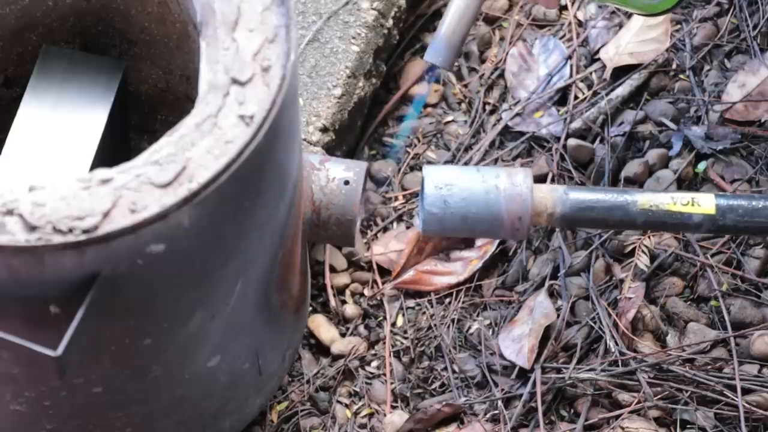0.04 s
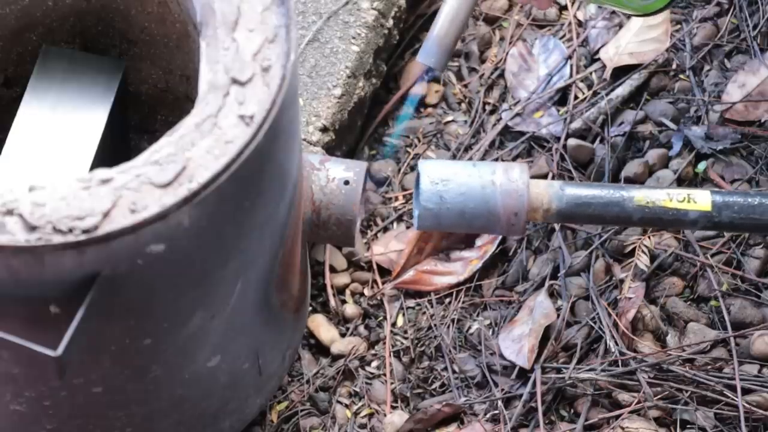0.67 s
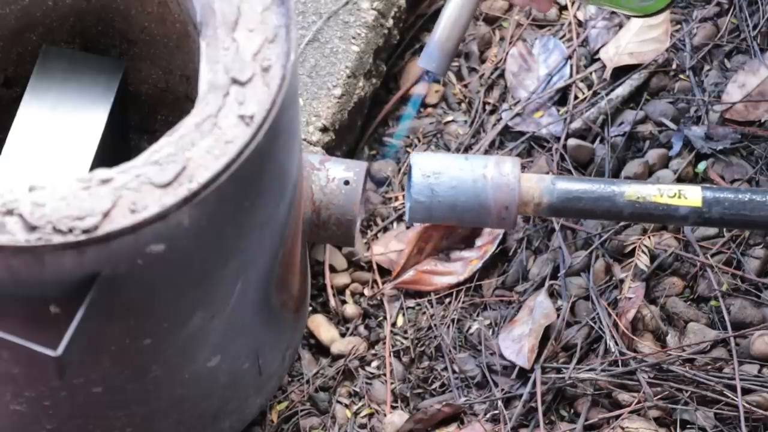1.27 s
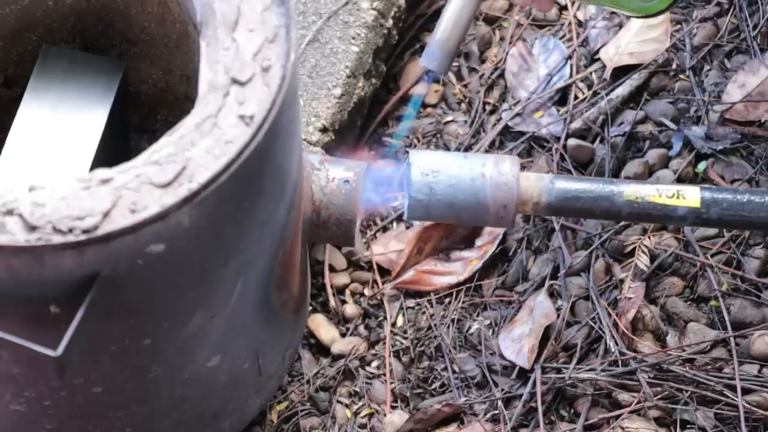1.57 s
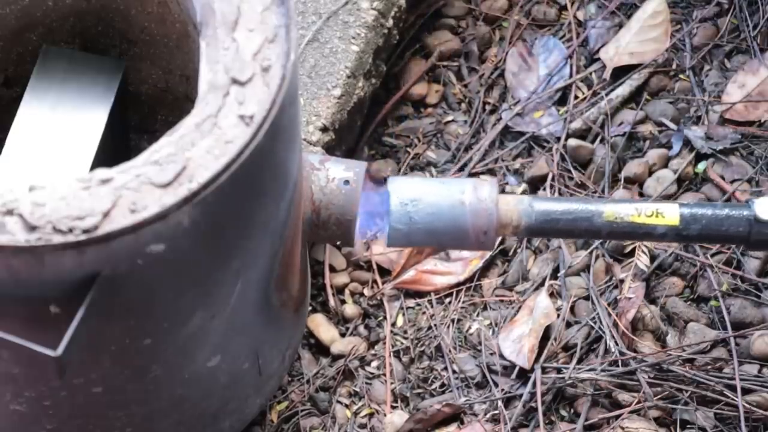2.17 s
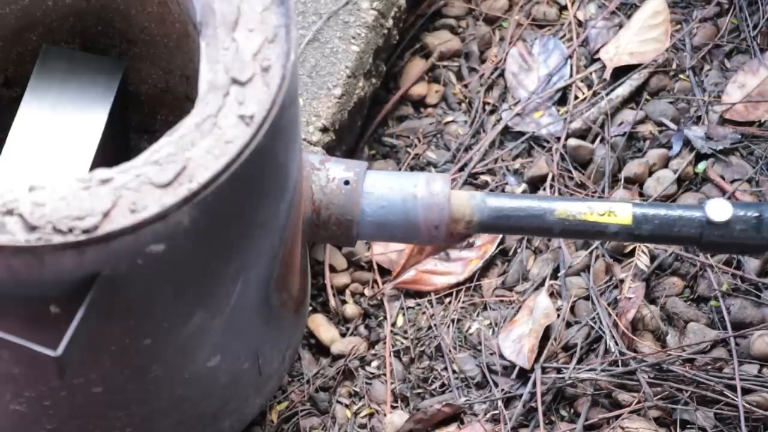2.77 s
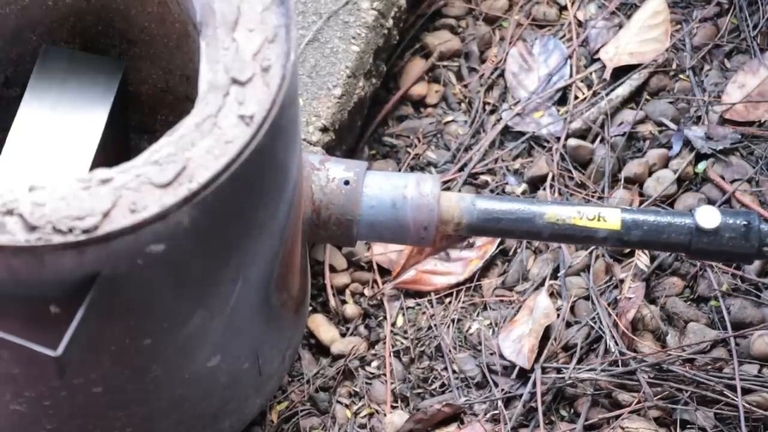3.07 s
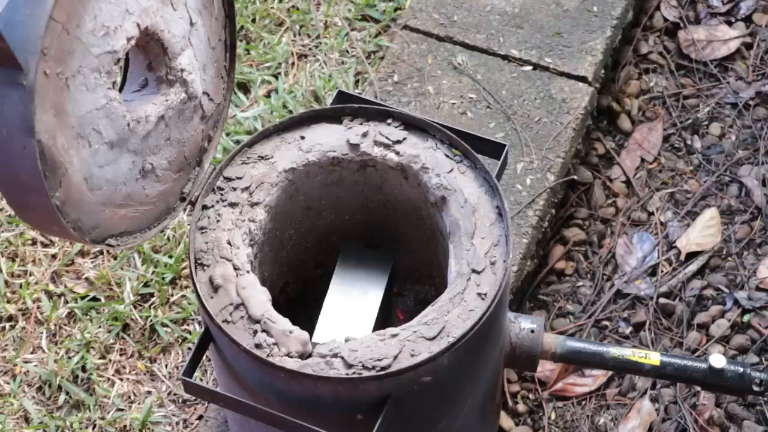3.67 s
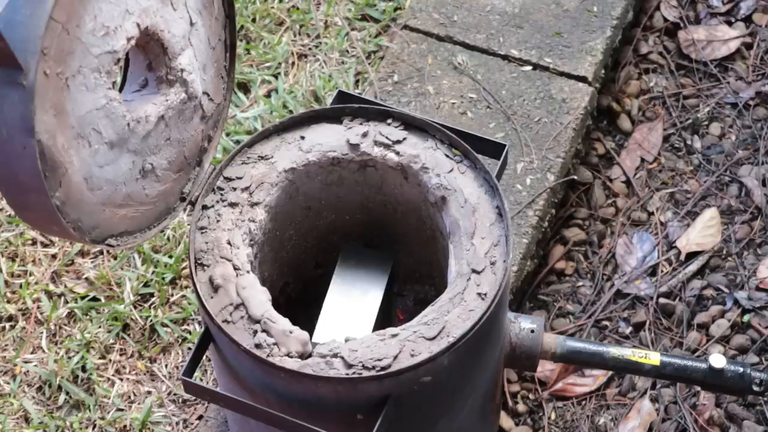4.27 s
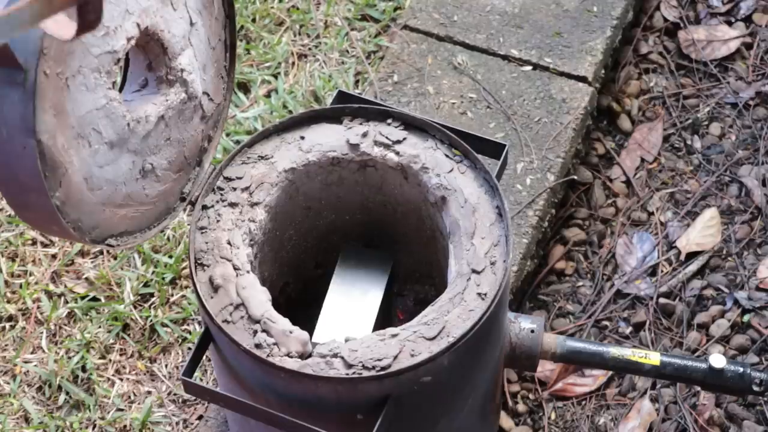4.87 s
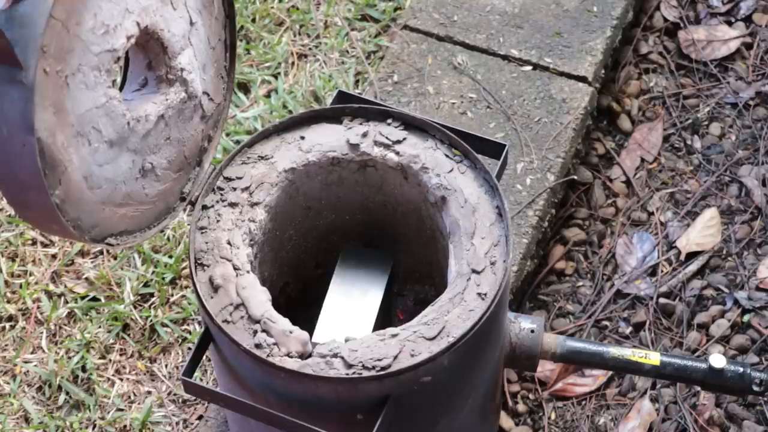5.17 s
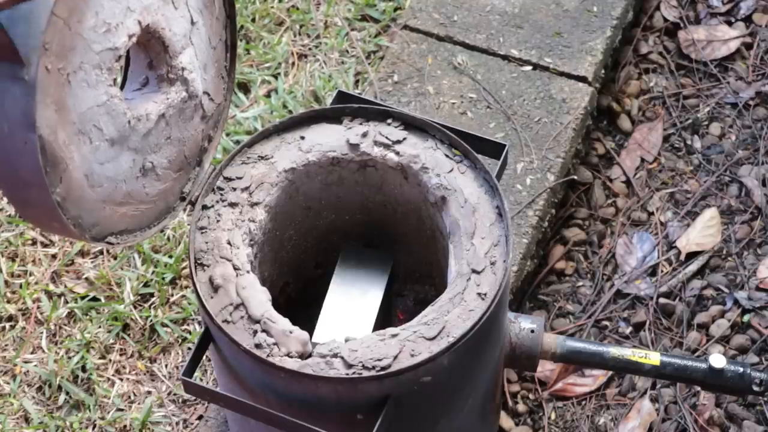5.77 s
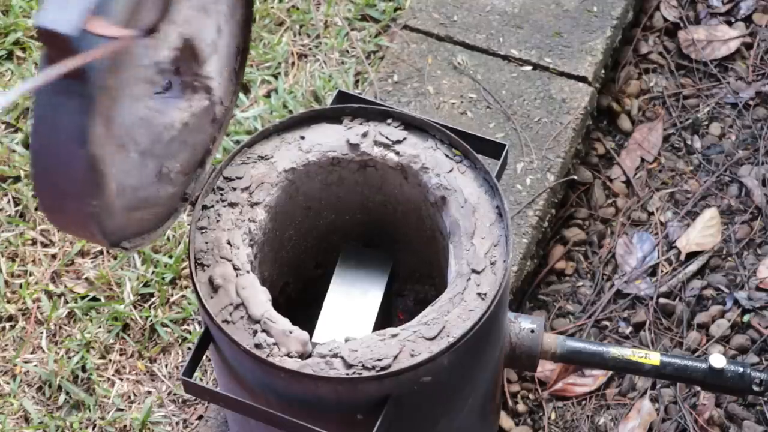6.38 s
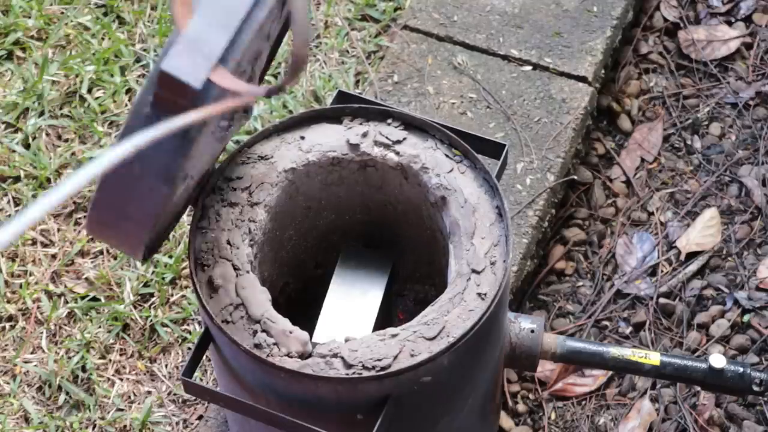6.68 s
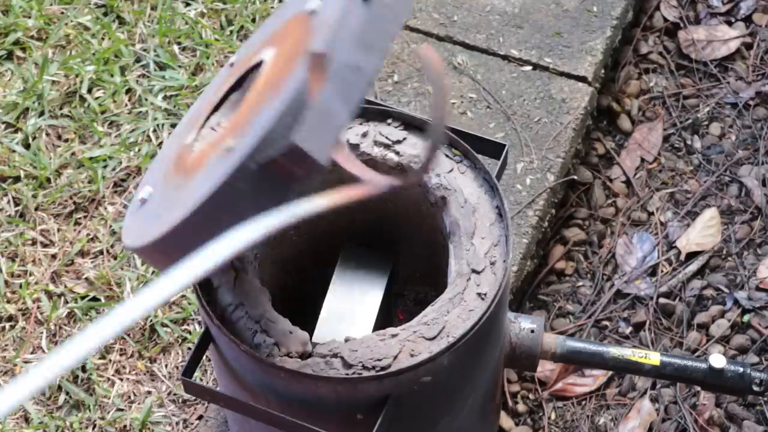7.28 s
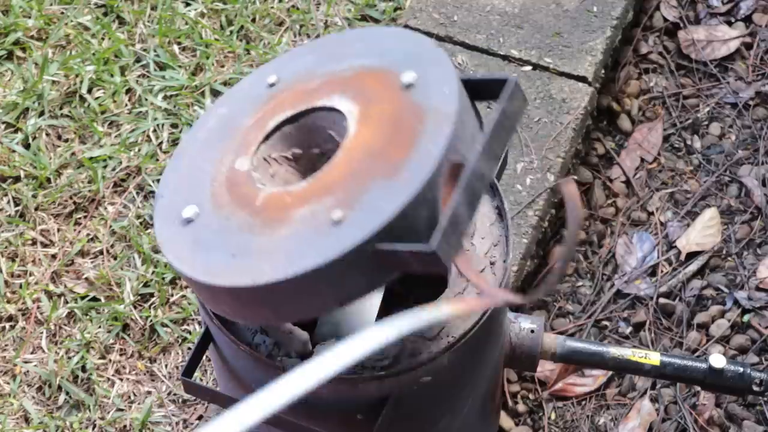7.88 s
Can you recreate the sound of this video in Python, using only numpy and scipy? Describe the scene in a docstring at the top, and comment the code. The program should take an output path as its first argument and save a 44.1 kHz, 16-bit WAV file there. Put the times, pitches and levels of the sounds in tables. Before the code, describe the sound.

A gas burner catches with a thump and settles into a hollow roar inside a furnace, while steel parts clink and scrape outdoors.

```python
"""Lighting a small gas furnace

A hand torch hisses and flutters outdoors. A gas burner catches with a whoomph and is pushed into the
side port of a clay-lined furnace: its bright open flame gives way to a hollow roar as it drives the
chamber's air modes. The steel pipe clinks in the port, a hook clicks and scrapes as it is picked up,
and the lid swings over the mouth, sweeping the colour of the roar."""
import sys
import numpy as np
from scipy import signal
from scipy.fft import rfft, irfft
from scipy.io import wavfile
from scipy.ndimage import uniform_filter1d, map_coordinates

SR = 44100
rng = np.random.default_rng(int(sys.argv[2]) if len(sys.argv) > 2 else 0)


def generate_wav(sig):
    """Save sig (samples, or channels by samples) to the path in sys.argv[1] as 16-bit PCM at SR."""
    pcm = np.round(np.clip(np.atleast_2d(sig).T, -1, 1) * 32767).astype(np.int16)
    wavfile.write(sys.argv[1], SR, pcm)


N = 354563
TIME = np.arange(N) / SR
FREQ = np.maximum(np.arange(N // 2 + 1) * SR / N, 1)
BLAST_S, BLAST_RISE_S = 1.452, 0.045  # the burner's flame takes hold

# chamber air modes with the nozzle outside the port (frequency [Hz], width [Hz], gain [dB])
OPEN_CHAMBER_MODES = [(313.5, 34, 13.2), (390, 17, 8.9), (453.4, 33, 13.6), (621, 81, 10.8),
                      (717.6, 31, 12), (818, 20, 6.2), (906, 30, 9.3)]


def undb(db):
    """Decibels to gain."""
    return 10 ** (np.asarray(db) / 20)


def ramp(start_s, rise_s):
    """A straight rise from 0 to 1."""
    return np.clip((TIME - start_s) / rise_s, 0, 1)


def swell(peak_s, half_s):
    """A smooth rise to 1 and fall back to 0."""
    return np.exp(-((TIME - peak_s) / half_s) ** 2)


def wobble(rate_hz):
    """Random levels, each held for 1 / rate_hz seconds and smoothed twice; spread near 1."""
    hold = max(int(SR / rate_hz), 2)
    steps = np.repeat(rng.standard_normal(N // hold + 1), hold)
    return 1.3 * uniform_filter1d(uniform_filter1d(steps, hold), hold)[:N]


def automation(table):
    """Each value column of a table, joined by straight lines in time."""
    times, *columns = np.transpose(table)
    return [np.interp(TIME, times, column) for column in columns]


def eq_curve(points):
    """(frequency [Hz], value) points joined by straight lines on a log-frequency axis."""
    hz, value = np.transpose(points)
    return np.interp(np.log(FREQ), np.log(hz), value)


def resonances(modes):
    """Gain by frequency of a set of peaks and hollows."""
    return undb(sum(db / (1 + (2 * (FREQ - hz) / width) ** 2) for hz, width, db in modes))


def add(out, start_s, sound):
    """Mix a short sound in at its time."""
    start = max(int(start_s * SR), 0)
    out[:, start:start + sound.shape[1]] += sound[:, :max(N - start, 0)]


def reflections(sound, strength=0.9, from_hz=4200, left_lag_s=5e-5):
    """Hard surfaces nearby comb the treble; the sound arrives a little earlier on the right."""
    # bounces off furnace wall, paving and ground (left delay [s], right delay [s], gain [ratio])
    echoes = [(.00085, 0.00093, .2), (.00141, 0.0013, 0.31), (.00262, 0.002, .2), (.0061, 0.007, 0.31),
              (0.011, .0109, .16)]
    share = strength / (1 + (from_hz / FREQ) ** 4)
    phase = -2j * np.pi * FREQ
    bounces = sum(gain * np.exp(phase * [[left], [right]]) for left, right, gain in echoes)
    comb = (1 + share * bounces) / np.sqrt(1 + share ** 2 * sum(gain ** 2 for _, _, gain in echoes))
    return irfft(rfft(sound) * comb * np.exp(phase * [[left_lag_s], [0]]), N)


def turbulence(spectrum, modes, pan_db=0):
    """Resonant flow noise at rms 1: the bass is near mono, the treble wide and leaning right."""
    # stereo likeness (frequency [Hz], correlation [0-1])
    likeness = [(60, .992), (290, .975), (640, .88), (1100, .82), (1600, .55), (3100, .4), (6000, .15),
                (15000, .1)]
    # stereo balance (frequency [Hz], left minus right [dB])
    balance = [(60, 1), (380, 0), (700, -1.2), (1250, -1), (2200, -8), (3200, -6.5), (4600, -4.5),
               (8000, -8.5), (15000, -10)]
    mid, side = rng.standard_normal((2, len(FREQ))) + 1j * rng.standard_normal((2, len(FREQ)))
    alike, sign = eq_curve(likeness), np.array([[1], [-1]])
    noise = np.sqrt(1 + alike) * mid + sign * np.sqrt(1 - alike) * side
    colour = undb(eq_curve(spectrum)) * resonances(modes)
    pan = undb(sign * (eq_curve(balance) + pan_db) / 2)
    flow = reflections(irfft(noise * colour * pan, N))
    return flow / flow.std()


def grit(envelope, hz, octaves, pan_db):
    """Stereo contact noise, shaped by an envelope and filtered to a band around hz."""
    n = len(envelope)
    freq = np.maximum(np.arange(n // 2 + 1) * SR / n, 1)
    band = np.exp(-0.5 * (np.log2(freq / hz) / octaves) ** 2)
    band /= np.sqrt(np.mean(band ** 2))
    noise = rng.standard_normal((2, n)) + 0.5 * rng.standard_normal(n)
    return irfft(rfft(noise * envelope) * band, n) * undb([[pan_db / 2], [-pan_db / 2]])


def torch(aside_s=1.76, off_s=3.7, fade_s=0.1, attack_s=0.016, release_s=0.016):
    """A whistling gas jet and a small flame that rasps on steel; drawn aside, only the jet hisses on."""
    # spectra of the flame, its rasp and the gas jet (frequency [Hz], level [dB])
    flame_eq = [(20, -20), (50, -6), (90, -3), (170, 0), (250, -9.5), (400, -5.5), (600, -3.5),
                (900, -13.5), (1500, -26), (4000, -42)]
    rasp_eq = [(150, -24), (400, 5.5), (900, 5), (1400, -5), (1900, -8.5), (2400, -6.5), (3300, -6.5),
               (4800, -13.5), (8000, -11.5), (11000, -21), (16000, -34)]
    jet_eq = [(1000, -6), (2500, -4.5), (4000, -3), (5300, -5.5), (7200, -1), (9000, -0.5), (12000, -3),
              (13000, -7), (16000, -15)]
    # resonances of the flame beside the port, and of the jet (frequency [Hz], width [Hz], gain [dB])
    flame_modes = [(318, 57, 12.5), (466, 23, 12), (1380, 120, 9), (1620, 90, 11), (2250, 170, 12),
                   (2930, 300, 4.5)]
    jet_modes = [(3820, 360, 9.9), (7900, 380, 7.1), (8240, 770, 9.4), (10600, 200, 5), (11850, 300, 9.3)]
    # the flame licks the burner's steel nozzle (start [s], length [s], rasp level [dB])
    touches = [(-0.02, 0.068, -36), (0.073, 0.26, -39.5), (0.187, 0.082, -38), (0.56, 0.016, -44),
               (0.68, 0.22, -44)]
    touch = sum(undb(db) * ramp(start, attack_s) * np.exp(-np.maximum(TIME - start - length, 0) / release_s)
                for start, length, db in touches)
    flame = turbulence(flame_eq, flame_modes) * (undb(-43.5) + undb(-14) * touch)
    flame *= undb(1.5 * wobble(30))
    rasp = turbulence(rasp_eq, flame_modes, pan_db=1) * (undb(-62.5) + touch)
    rasp *= undb(1.2 * wobble(59.4))
    aside = ramp(aside_s - fade_s, fade_s)
    jet = turbulence(jet_eq, jet_modes, pan_db=3) * undb(-48 - 2 * aside)
    return (flame + rasp) * (1 - aside) + jet * (1 - ramp(off_s - fade_s, fade_s))


def burn_envelope(seated, catch_db, open_db, seated_db, power):
    """Gain of one burner layer: a soft catch, the blast, then a level set by the nozzle's depth."""
    catch = undb(catch_db) * ramp(start_s=1.385, rise_s=0.012)
    full = undb(open_db + (seated_db - open_db) * seated ** power)
    blast = ramp(BLAST_S, BLAST_RISE_S) ** 2
    return catch * (1 - blast) + full * blast


def burner():
    """Unsteady combustion drives the chamber's air; seating the nozzle turns open flame to hollow roar."""
    # how far the nozzle sits in the port (time [s], depth [0-1])
    seating = [(1.4, 0.02), (2.25, 0.02), (2.64, 0.2), (2.70, 0.44), (2.8, 0.62), (3.5, 0.73), (4.3, 0.99),
               (8.04, 0.97)]
    # the open flame dips and surges on its way to the port
    # (peak [s], half length [s], rumble change [dB], rasp change [dB])
    surges = [(1.557, 0.087, -3, -0.1), (1.702, 0.1, 5, 0.5), (2.52, 0.15, 2, 1.5)]
    # spectra of the flame's layers and the gas jet (frequency [Hz], level [dB])
    rumble_eq = [(15, -38), (28, -23), (45, -10), (70, -0.5), (110, -6), (180, -4.5), (230, -11),
                 (500, -47)]
    open_roar_eq = [(120, -23), (240, -4.5), (400, 2.5), (550, -8.5), (750, -7), (1000, -8), (1400, -19.5),
                    (2500, -40)]
    seated_roar_eq = [(120, -14.5), (210, -1), (250, 3.5), (330, 0.5), (480, -7), (560, -11.5),
                      (760, -13.5), (1000, -14), (1330, -17.5), (1550, -33), (3000, -57)]
    open_rasp_eq = [(300, -27), (700, -16), (1200, 0), (1600, -1), (2000, -0.5), (2450, -5), (2750, -9.5),
                    (3500, -12), (4600, -13), (7000, -16), (14000, -37)]
    seated_rasp_eq = [(300, -19), (1000, 6), (1400, -3.5), (1650, 2), (2000, 1.5), (2450, -0.5),
                      (2750, -8.5), (3400, -11.5), (4600, -10), (7000, -14.5), (14000, -44)]
    jet_eq = [(1500, -1.5), (3500, -1), (5000, -7.5), (7000, 0), (9000, 4), (11500, 4.5), (13000, 1),
              (14500, -8), (16000, -17)]
    # peaks and hollows of the chamber and the burner tube (frequency [Hz], width [Hz], gain [dB])
    bass_modes = [(100, 20, 8), (116.7, 14, -2.5), (148.4, 9.7, -4.5), (165.7, 28, 5.5), (205.5, 11, -14)]
    seated_chamber_modes = [(208, 10.5, -9), (239, 13, 2), (282.4, 44, 7), (342, 59, 2), (359, 9.5, -6),
                            (382.5, 50, 10.5), (432, 9.7, -9), (449, 40, 10), (620, 64, 9), (685, 63, 11),
                            (764, 24, -8), (814, 43, 4.5), (888, 32, -10.5), (920, 46, 5.5), (990, 45, 3.5),
                            (1095, 42, -9.5), (1140, 35, 6.5), (1253, 19, -2.5), (1279, 26, 7.5),
                            (1424, 32, 11), (1600, 33, -15)]
    open_tube_modes = [(1403, 22, 12.5), (1550, 25, 5), (1684, 36, 7), (1865, 42, 7), (2085, 47, 5.5),
                       (2290, 120, 2.5), (2550, 42, 9), (2840, 180, -3.5), (3057, 88, 11.5),
                       (3680, 69, 3.5), (4660, 190, -5.5), (6360, 210, 7.5), (8740, 340, 11),
                       (11100, 230, 1)]
    seated_tube_modes = [(1555, 47, 2.5), (1860, 83, 3), (2166, 52, 10), (2230, 45, -8), (2370, 29.4, 6),
                         (2465, 46, 7), (2620, 290, -7), (2916, 58, 10.5), (3070, 96, 6.5), (3480, 170, -3),
                         (3700, 110, 9), (4090, 170, 2.5), (4700, 300, -4), (10900, 600, 3)]

    seated, = automation(seating)
    inside, outside = np.sqrt(seated), np.sqrt(1 - seated)
    flutter = wobble(45)  # the flame front flaps, moving roar, rasp and jet together
    overshoot_db = 1.5 * swell(peak_s=1.555, half_s=0.036)
    rumble_surge_db = sum(db * swell(peak, half) for peak, half, db, _ in surges)
    rasp_surge_db = sum(db * swell(peak, half) for peak, half, _, db in surges)

    rumble = turbulence(rumble_eq, bass_modes) * undb(rumble_surge_db)
    rumble *= burn_envelope(seated, catch_db=-36, open_db=-25.5, seated_db=-28, power=3.2)

    roar = outside * turbulence(open_roar_eq, OPEN_CHAMBER_MODES)
    roar += inside * turbulence(seated_roar_eq, seated_chamber_modes)
    roar *= burn_envelope(seated, catch_db=-44, open_db=-28.5, seated_db=-18, power=0.13)
    roar *= undb(overshoot_db + 0.71 * flutter)

    rasp = outside * turbulence(open_rasp_eq, open_tube_modes, pan_db=-1)
    rasp += inside * turbulence(seated_rasp_eq, seated_tube_modes)
    rasp += port_gap(seated)
    rasp *= burn_envelope(seated, catch_db=-56, open_db=-30.5, seated_db=-42, power=2)

    jet = turbulence(jet_eq, seated_tube_modes, pan_db=1.5) * undb(1.2 * flutter)
    jet *= burn_envelope(seated, catch_db=-60, open_db=-41, seated_db=-44.5, power=6)

    rasp_motion_db = rasp_surge_db + overshoot_db + 0.8 * flutter + 0.98 * wobble(250)
    return rumble + roar + rasp * undb(rasp_motion_db) + jet


def whoomph(peak_s=1.573, rise_s=0.021, fall_s=0.028):
    """Gas gathered in the chamber goes up in one thump; the blast sets the burner tube singing."""
    # tube modes rung by the blast (frequency [Hz], width [Hz], gain [dB])
    tube_modes = [(2100, 79, 16), (2530, 70, 11), (3080, 90, 16)]
    # spectra of the thump and the tube's ring (frequency [Hz], level [dB])
    thump_eq = [(40, -14), (90, 10), (180, -9), (320, 5), (480, -7), (800, -35), (2500, -44)]
    ring_eq = [(1300, -25), (2100, 0), (3100, -6), (4000, -30)]
    age = TIME - peak_s
    thump = turbulence(thump_eq, OPEN_CHAMBER_MODES) * np.exp(np.minimum(age / rise_s, -age / fall_s))
    ring = turbulence(ring_eq, tube_modes) * swell(1.57, 0.083) * ramp(BLAST_S, BLAST_RISE_S)
    return undb(-13) * thump + undb(-32.5) * ring


def port_gap(seated, loudest_depth=0.7, depth_spread=0.24, glide=0.24):
    """The gap round the nozzle resonates while it is part way in, rising in pitch as it narrows."""
    # air mode of the ring-shaped gap (frequency [Hz], width [Hz], gain [dB])
    gap_modes = [(2360, 260, 17)]
    ring = turbulence([(1200, -28), (2300, 2), (4500, -31)], gap_modes)
    offset = seated - loudest_depth
    playhead = np.cumsum(1 + glide * offset) % N
    gliding = np.array([map_coordinates(channel, [playhead], mode="mirror") for channel in ring])
    return gliding * np.exp(-(offset / depth_spread) ** 2) * undb(-8)


def scrapes(rough_db=3.0, grain_db=1.0):
    """Something hard drags over grit in uneven slips and snapping grains; some drags ring the hook."""
    # (peak [s], rise [s], fall [s], level [dB], centre [Hz], width [octaves], hook share [0-1])
    drags = [(2.774, 0.0088, 0.012, -33, 4770, 1.1, 0.1), (4.999, 0.004, 0.014, -32, 8040, 0.88, .3),
             (5.135, 0.0014, 0.021, -29.5, 3800, 0.83, 0), (5.205, 0.03, 0.049, -33, 6300, 1.4, 0.6),
             (5.287, 0.003, 0.02, -28, 4400, 1.1, 0.25), (5.367, 0.0033, 0.016, -25.5, 3800, 0.98, 0.2),
             (5.485, .004, 0.0074, -31, 2300, 0.11, 0), (5.487, 0.0061, 0.006, -35, 3130, 0.12, 0),
             (5.481, 0.0022, 0.019, -34.5, 3280, 0.9, 0.1), (5.704, .004, 0.0063, -33, 2520, 0.9, 0),
             (5.740, 0.0044, 0.022, -36.5, 8500, 1.2, 1), (5.838, 0.045, 0.036, -31, 9200, 1.3, 1),
             (5.859, 0.014, 0.016, -26, 4000, 0.85, 0.55)]
    # thin rings of the steel hook (frequency [Hz], width [Hz], gain [dB])
    hook_modes = [(2700, 100, 11), (4060, 110, 13), (5870, 59, 14), (6400, 70, 9), (7300, 97, 15),
                  (8100, 460, -11), (8700, 80, 17), (8850, 90, 10), (9660, 60, 15), (10700, 58, 11),
                  (11030, 80, 7), (11300, 140, 11), (14500, 900, -10), (15400, 200, 11)]
    plain, ringing = np.zeros((2, 2, N))
    age = TIME[:SR // 2] - 0.25
    for peak_s, rise_s, fall_s, db, hz, octaves, share in drags:
        grains = undb(grain_db * np.minimum(rng.exponential(size=len(age)), 6))
        slips = undb(rough_db * wobble(700)[:len(age)]) * grains / np.sqrt(np.mean(grains ** 2))
        envelope = np.exp(np.minimum(age / rise_s, -age / fall_s)) * slips
        scrape = undb(db) * grit(envelope, hz, octaves, pan_db=-2.5)
        add(plain, peak_s + age[0], (1 - share) * scrape)
        add(ringing, peak_s + age[0], share * scrape)
    return plain + irfft(rfft(ringing) * resonances(hook_modes), N)


def clicks(ring_hz=14400, ring_t60=0.11, tail_db=-27, tail_t60=0.19):
    """Each contact cracks, scatters briefly off the ground and rings a cluster of high pipe modes."""
    # hits of steel and grit (time [s], level [dB], centre [Hz], width [octaves], t60 [s], ring [dB])
    hits = [(2.778, -35, 9500, .05, .04, -34), (2.8313, -23.5, 3500, 1.2, 0.032, -13),
            (2.8345, -22.5, 8000, 2, 0.056, -10.5), (3.3185, -34.5, 7000, 1.2, 0.16, -12),
            (3.635, -35, 7000, 1.2, 0.038, -5), (4.137, -8.5, 10900, .42, 0.01, -45),
            (4.1370, -14.5, 3540, 0.22, 0.009, -45), (4.1370, -18, 5700, 0.22, 0.0067, -45),
            (4.14, -28, 9500, .8, 0.037, -35), (4.1870, -24, 4800, 1, 0.0057, -40),
            (5.2373, -11, 4100, 0.64, 0.0036, -40), (7.1824, -29.5, 11000, 0.73, 0.054, -30),
            (7.882, -35.5, 10500, 0.42, .05, -27), (8.0043, -37, 9900, 1, 0.049, -35)]
    out = np.zeros((2, N))
    age = TIME[:SR // 4] - 0.002
    struck, elapsed = age >= 0, np.maximum(age, 0)
    for at_s, db, hz, octaves, t60, ring_db in hits:
        crack = struck * (undb(-60 * elapsed / t60) + undb(tail_db - 60 * elapsed / tail_t60))
        ring = struck * undb(ring_db - 60 * elapsed / ring_t60)
        click = grit(crack, hz, octaves, pan_db=-3) + grit(ring, ring_hz, octaves=0.02, pan_db=-3)
        add(out, at_s + age[0], undb(db) * click)
    return out


def under_lid(fire, mids_from_hz=800, echo_from_hz=1400, top_hz=3200, sound_m_per_s=343):
    """The lid throws the roar's mids forward, then shades them; its moving echo sweeps the colour."""
    # the lid swings over the mouth (time [s], extra echo path [m], echo gain [ratio], mids [dB])
    swing = [(5.5, 0.47, 0, 1.5), (6.35, 0.54, 0.45, 0.5), (6.9, 0.43, 0.12, 1.5), (7.25, 0.45, 0.28, 1.5),
             (7.7, 0.31, 0, 1.5), (8.04, .33, 0.13, -4)]
    # the wedge of air under the tilted lid (frequency [Hz], width [Hz], gain [dB])
    wedge_modes = [(400, 120, 1), (990, 136, -2.5), (1200, 200, 3), (1590, 280, 5.5), (2330, 170, -4)]
    path_m, echo_gain, mids_db = automation(swing)
    spectrum = rfft(fire)
    dulled = spectrum / (1 + (FREQ / top_hz) ** 8)
    mids = irfft(dulled / (1 + (mids_from_hz / FREQ) ** 8), N)
    bounced = irfft(dulled / (1 + (echo_from_hz / FREQ) ** 8), N)
    echo = np.array([np.interp(TIME - path_m / sound_m_per_s, TIME, channel) for channel in bounced])
    wedge = irfft(spectrum * (resonances(wedge_modes) - 1), N) * swell(peak_s=7.07, half_s=0.61)
    return fire + (undb(mids_db) - 1) * mids + echo_gain * echo + wedge


def scene():
    """Torch, burner and steel handling, close by in the open air."""
    # body of the steel parts, in every click and scrape (frequency [Hz], width [Hz], gain [dB])
    steel_modes = [(1310, 420, 21.5), (2150, 610, 5.5), (3520, 350, 1), (4570, 470, -4.5), (5200, 340, 1),
                   (10200, 490, 0.5)]
    fire = under_lid(burner() + whoomph())
    contacts = clicks() + reflections(scrapes(), strength=0.7)
    return torch() + fire + irfft(rfft(contacts) * resonances(steel_modes), N)


def record(dry):
    """A soft clip rounds the highest peaks and a steep low-pass cuts the very top."""
    ceiling, top_hz = 0.62, 15800
    rounded = dry / (1 + (dry / ceiling) ** 12) ** (1 / 12)
    return signal.sosfilt(signal.ellip(10, 0.2, 80, top_hz, fs=SR, output="sos"), rounded)


dry = scene()
out = record(dry)
generate_wav(out)
```